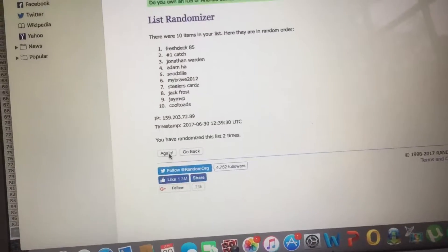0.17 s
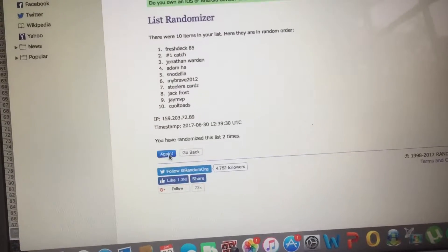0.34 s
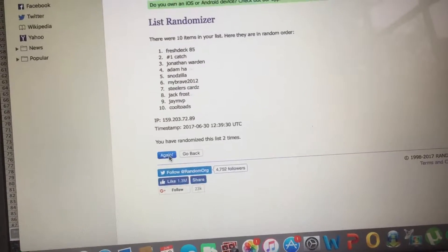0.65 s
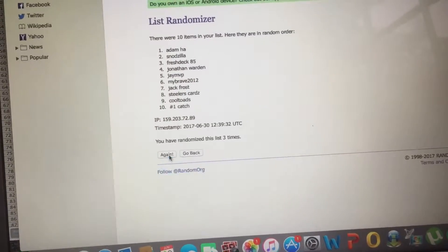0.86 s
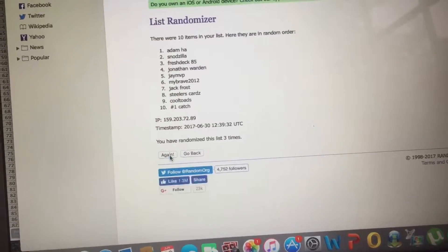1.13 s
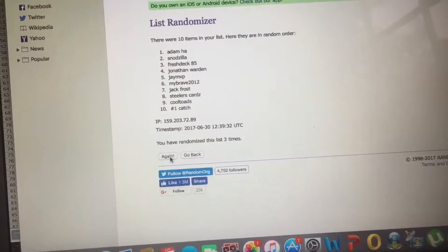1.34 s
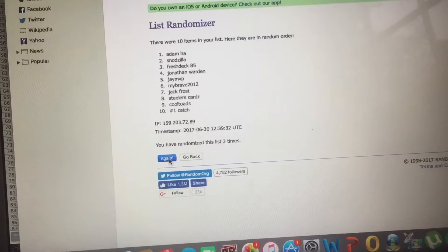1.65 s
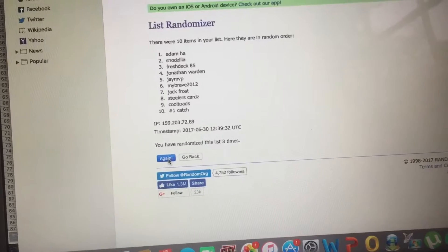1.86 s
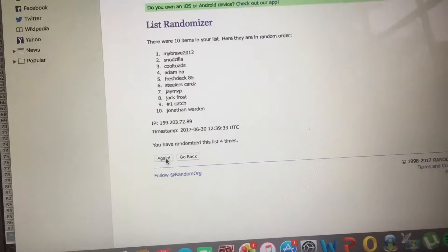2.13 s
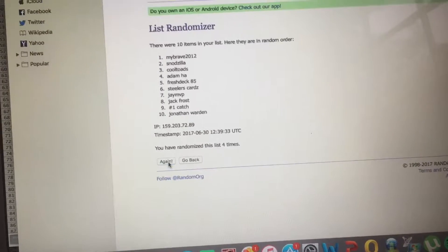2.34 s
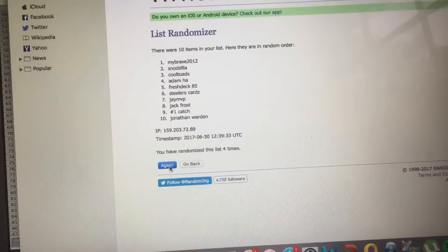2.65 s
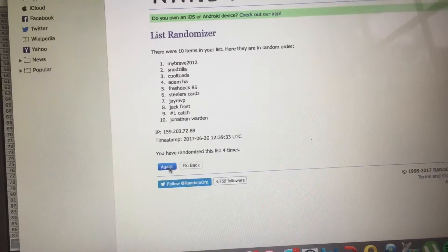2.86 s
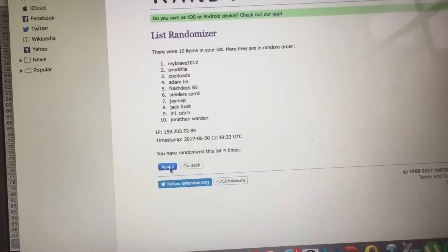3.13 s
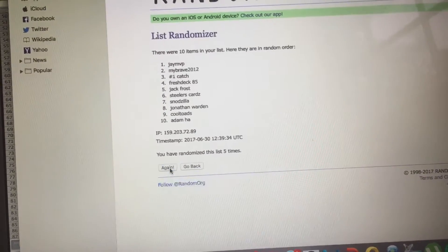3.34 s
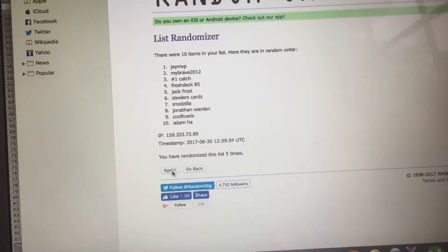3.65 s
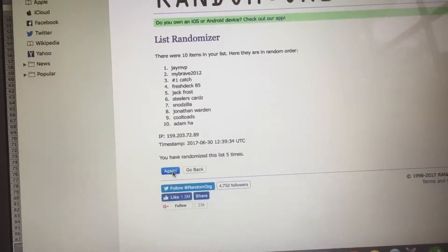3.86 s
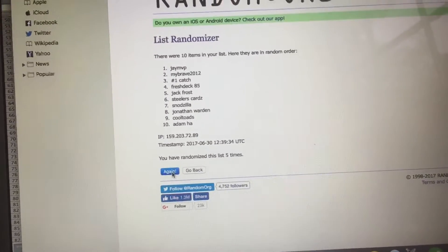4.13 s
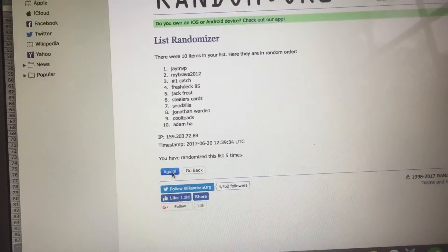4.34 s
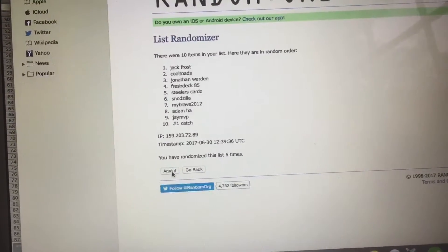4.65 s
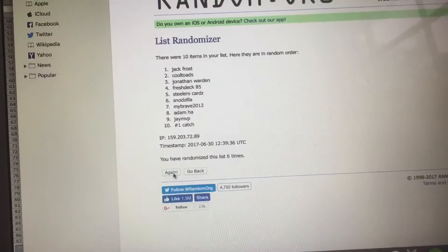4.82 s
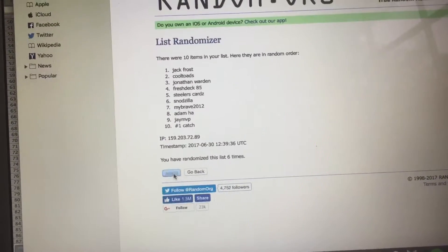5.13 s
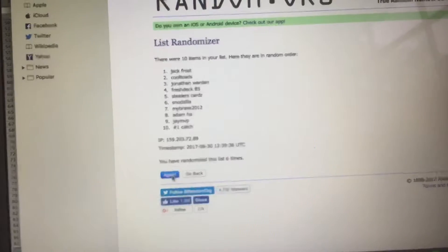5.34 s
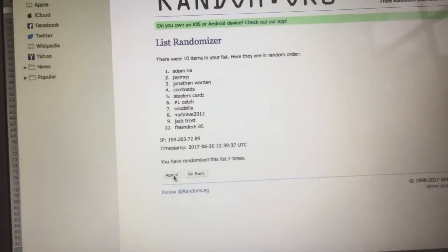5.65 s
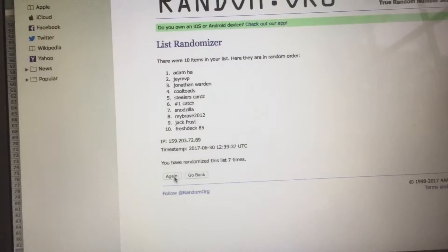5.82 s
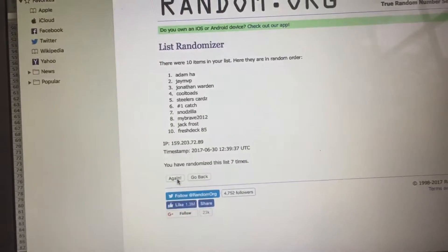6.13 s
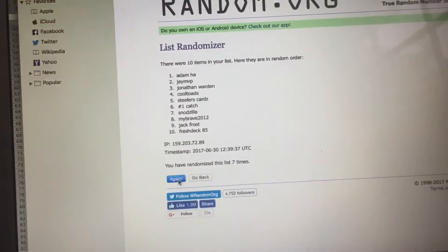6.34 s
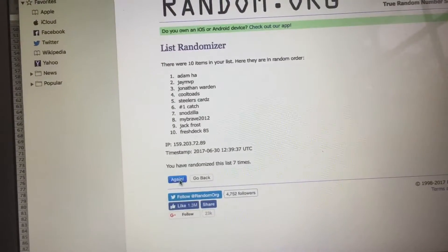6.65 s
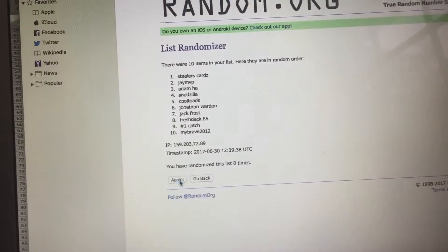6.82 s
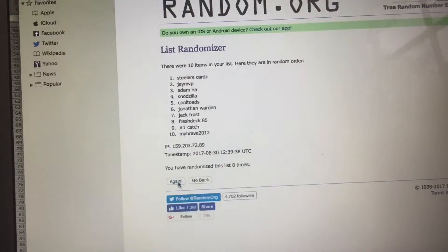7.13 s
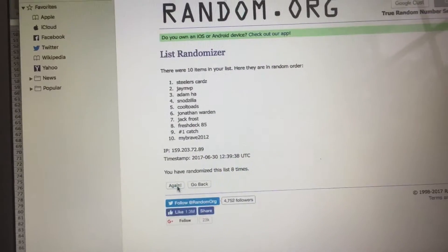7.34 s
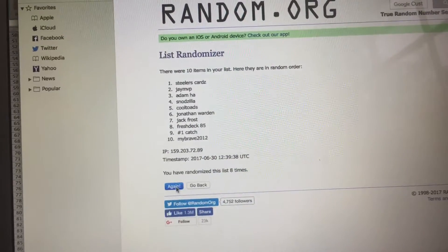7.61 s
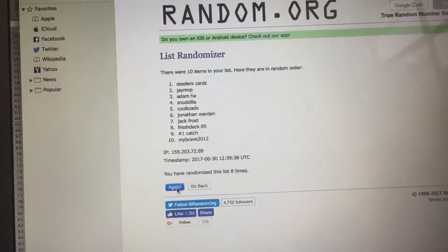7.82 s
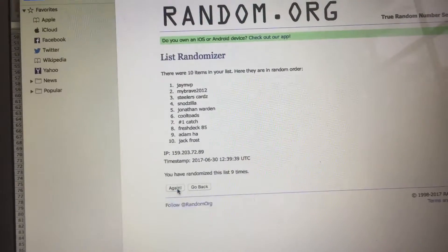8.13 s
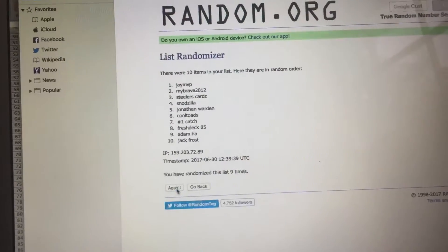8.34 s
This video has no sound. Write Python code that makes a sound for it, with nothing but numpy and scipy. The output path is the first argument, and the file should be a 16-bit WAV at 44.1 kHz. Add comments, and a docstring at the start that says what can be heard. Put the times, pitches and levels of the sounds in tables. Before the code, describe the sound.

A computer mouse is clicked on a desk in a small quiet room, close to a hand-held microphone. Seven clicks come at an even pace, at about 0.3, 1.6, 2.6, 3.9, 5.2, 6.4 and 7.7 seconds. Each is a crisp plastic snap, followed a tenth of a second later by a dull release and a light tick as the finger lifts. The click at 3.9 seconds is doubled. Small hollow plastic knocks sound near 1 and 2.2 seconds, and a very faint thin squeak just after the first. The hand bumps softly on mouse and desk between clicks, most clearly around 6.3, 7.4 and 8.4 seconds. Behind everything run two faint clock-like tickings, one quick and one about once a second, over a low rumble and even hiss. The room adds a short reverberation.

```python
"""A desk in a small quiet room, with a hand-held phone microphone close to a computer mouse.
The mouse is clicked about every 1.2 s: each press snaps the switch and rings the shell, the button
comes back with a dull thock, and a light tick follows as the finger lifts. Between clicks the hand
bumps softly and plastic knocks. Behind them lie two faint clock-like tickings, one thin squeak
and low room noise."""
import sys
import numpy as np
from scipy import signal
from scipy.fft import rfft, irfft
from scipy.io import wavfile

SR = 44100
rng = np.random.default_rng(int(sys.argv[2]) if len(sys.argv) > 2 else 0)


def to_wav(sig):
    """Store sig (one row per channel, or 1-D mono) as 16-bit WAV at the path in sys.argv[1].

    Samples outside -1..1 are clipped; the rate is SR.
    """
    pcm = np.clip(np.atleast_2d(sig), -1, 1) * 32767
    pcm = np.round(pcm).astype(np.int16)
    wavfile.write(sys.argv[1], SR, pcm.T)  # frames by channels


N = 373968
BLOW_SIZE = 4096  # samples in one click, thud or tick
FREQ = np.maximum(np.fft.rfftfreq(BLOW_SIZE, 1 / SR), 1)

# room tone, its rumble and middle: frequency_hz, density_db
ROOM_TONE = [(20, -26), (35, -1.5), (60, 5), (85, -3.5), (130, -3.5), (200, -3.5), (300, -12.5), (450, -17),
             (700, -21), (1050, -17), (1400, -20), (2500, -23), (4800, -30)]
# the hiss on top of it: frequency_hz, density_db
ROOM_HISS = [(5700, -27.5), (7000, -31.5), (9500, -32), (10500, -36.5), (12000, -33.5), (16000, -38.5)]
# the room's reverberation by band: centre_hz, level_db, t60_s
REVERB_BANDS = [(101, 5, 0.74), (237, -6, 0.69), (670, -11.5, 0.51), (1110, -5.5, 0.5), (1705, -17.5, 0.49),
                (2460, -5.5, 0.62), (2900, -16.5, 0.64), (4370, -12, 0.46), (8000, -11.5, 0.58),
                (15000, -12.5, 0.34)]
# the quick and the slow ticking: start_s, period_s
TICKINGS = [(.4702, .3), (.574, 1.0033)]
# colour of their ticks: frequency_hz, gain_db
TICK_COLOUR = [(800, -18.5), (2600, -10), (4500, -16), (6800, -21), (7800, 1), (8800, -22), (11000, -24.5),
               (15000, -16.5)]
# how the desk passes a thud on: frequency_hz, gain_db
DESK_RESPONSE = [(170, 4.5), (245, 1), (315, 3), (420, 2), (620, -3), (760, 8), (1000, 14), (1250, -4),
                 (2000, 17)]
# the clearer bumps of hand and mouse: start_s, peak_db, pitch_hz
HAND_BUMPS = [(0.498, -38.5, 87), (1.931, -44, 126), (2.013, -36, 149), (2.358, -42.5, 156),
              (3.137, -40, 70.0), (3.362, -37.5, 143), (3.68, -43, 168), (3.693, -39.5, 138),
              (3.92, -33, 116), (4.233, -43.5, 56), (6.036, -41, 188), (6.3, -25, 137), (6.353, -44, 118),
              (7.448, -29, 176), (8.333, -30.5, 172), (8.355, -29.5, 167), (8.426, -28, 347)]
# small hollow knocks of plastic: start_s, peak_db, pitch_hz
PLASTIC_KNOCKS = [(.9955, -48, 457), (.9972, -44.5, 1590), (2.1835, -59, 506), (2.184, -52.5, 875)]
# resonances of the mouse shell on the desk: pitch_hz, width_hz, level_db
SHELL_MODES = [(216, 270, -11), (492, 290, -9), (755, 100, -7.5), (910, 295, -10), (1227, 29, -6.5),
               (1546, 267, 0), (1719, 358, 1.5), (2140, 145, -6.5), (2468, 70, -13), (2887, 370, -12.5),
               (3290, 500, -13.5), (4400, 600, -18)]
# colour of the switch's bright crack: frequency_hz, gain_db
SWITCH_COLOUR = [(1500, -2), (3500, -2), (5200, -14), (6000, 8), (6700, -4), (7600, 2), (9400, 0),
                 (10400, -5), (12500, -7.5), (16000, -7.5)]
# the finger landing on the shell ahead of some presses, once as hard as a click: start_s, level_db
FINGER_LANDINGS = [(2.56, -45.5), (3.9095, -39), (3.9165, -20), (6.287, -52), (7.5901, -42.5)]
# presses of the button: start_s, level_db, held_s, lift_after_release_s, lift_level_db
PRESSES = [(0.338, -21, 0.098, 0.032, -39.5), (1.5655, -20, 0.096, 0.031, -42.5),
           (2.626, -21, 0.1, 0.022, -44.5), (3.9356, -19, 0.1, 0.038, -44.5),
           (5.2335, -20, .1045, 0.03, -44), (6.4114, -21, 0.12, 0.037, -42.5),
           (7.6504, -21, 0.11, .0357, -44)]


def undb(db):
    """Decibels to gain."""
    return 10 ** (np.asarray(db) / 20)


def colour(points, hz):
    """Gain at hz of (frequency_hz, gain_db) points joined on a log-frequency axis."""
    points_hz, db = np.transpose(points)
    return undb(np.interp(np.log(np.maximum(hz, 1)), np.log(points_hz), db))


def tinted_noise(points, size):
    """Noise of rms 1 with the given colour."""
    noise = irfft(rfft(rng.standard_normal(size)) * colour(points, np.fft.rfftfreq(size, 1 / SR)), size)
    return noise / noise.std()


def minimum_phase(gain):
    """The spectrum of the promptest blow that has these gains."""
    cepstrum = irfft(np.log(gain))
    cepstrum[1:BLOW_SIZE // 2] *= 2
    cepstrum[BLOW_SIZE // 2 + 1:] = 0
    return np.exp(rfft(cepstrum))


def delay(seconds):
    """The spectrum of a delay."""
    return np.exp(-2j * np.pi * FREQ * seconds)


def soft_contact(hz, order):
    """The spectrum of a soft push: flat up to hz, falling above."""
    return signal.freqs(*signal.butter(order, hz, analog=True), FREQ)[1]


def lossless_resonance(hz, width_hz):
    """An all-pass spectrum: it stores the band around hz and lets it go a moment later."""
    pole = hz ** 2 - FREQ ** 2 + 1j * FREQ * width_hz
    return np.conj(pole) / pole


def through_desk(spectrum, lag_s):
    """A pulse of peak 1 after travelling as a bending wave: lag_s late at 1 kHz, the lows later still."""
    pulse = irfft(spectrum * delay(2 * lag_s / np.sqrt(FREQ / 1000)))
    return pulse / np.abs(pulse).max()


def add(track, start_s, sound):
    """Mix a sound into the track at start_s."""
    i = max(int(round(start_s * SR)), 0)
    track[i:i + len(sound)] += sound[:max(N - i, 0)]


def room_tone(level_db=-62, waver_db=2, rumble_hz=350):
    """The bed of the room: even hiss over a low rumble that wavers."""
    noise = tinted_noise(ROOM_TONE + ROOM_HISS, N)
    rumble = signal.sosfiltfilt(signal.butter(2, rumble_hz, fs=SR, output="sos"), noise)
    knots = np.arange(0, N, SR // 12)
    waver = np.interp(np.arange(N), knots, rng.standard_normal(len(knots)))
    return undb(level_db) * (noise + rumble * (undb(waver_db * waver) - 1))


def room_reverb(direct, early_db=9, early_t60_s=0.1, first_echo_s=0.0037):
    """Strong early reflections reach the microphone from desk and screen, then a short diffuse tail."""
    t = np.arange(SR // 2) / SR
    log_hz = np.log(np.maximum(np.fft.rfftfreq(len(t), 1 / SR), 1))
    log_centres = np.log(np.array(REVERB_BANDS)[:, 0])
    noise, response = rfft(rng.standard_normal(len(t))), 0
    early = undb(early_db - 60 * t / early_t60_s)
    for (_, level_db, t60_s), share in zip(REVERB_BANDS, np.eye(len(REVERB_BANDS))):
        band = irfft(noise * np.interp(log_hz, log_centres, share), len(t))
        fade = (undb(-60 * t / t60_s) + early) * (t > first_echo_s)
        response = response + undb(level_db) * band * fade / np.sqrt(np.sum(fade ** 2))
    return signal.fftconvolve(direct, response)[:N]


def tickings(quick_db=-47.5, slow_db=-52.5, scatter_db=0.5, length_s=0.001):
    """Two faint, even series of clock-like ticks, each tick a tiny burst of coloured noise."""
    out, t = np.zeros(N), np.arange(BLOW_SIZE) / SR
    tint = minimum_phase(colour(TICK_COLOUR, FREQ))
    for (first_s, period_s), peak_db in zip(TICKINGS, (quick_db, slow_db)):
        for start_s in np.arange(first_s, N / SR, period_s):
            burst = rng.standard_normal(BLOW_SIZE) * np.exp(-(t / length_s) ** 4)
            tick = irfft(rfft(burst) * tint)
            peak = undb(peak_db + scatter_db * rng.standard_normal())
            add(out, start_s, peak * tick / np.abs(tick).max())
    return out


def squeak(start_s=1.125, length_s=0.44, level_db=-64, pitch_hz=2170, width_hz=90,
           attack_s=0.015, fade_s=0.018, linger_db=-12):
    """Faint rubbing on one narrow resonance: a quick swell that sinks to a trace."""
    t = np.arange(N) / SR - start_s
    tone = signal.lfilter(*signal.iirpeak(pitch_hz, pitch_hz / width_hz, fs=SR), rng.standard_normal(N))
    gate = np.clip(np.minimum(t, length_s - t) / attack_s, 0, 1)
    swell = np.exp(-np.maximum(t - attack_s, 0) / fade_s) + undb(linger_db)
    return undb(level_db) * gate * swell * tone / tone.std()


def thuds(blows, damping, cutoff_ratio, max_cutoff_hz, order, lag_s, rebound, rebound_s):
    """Each blow is a soft push and its rebound on one damped resonance, carried by the desk."""
    out, jf = np.zeros(N), 1j * FREQ
    desk = minimum_phase(colour(DESK_RESPONSE, FREQ))
    bounce = 1 + rebound * delay(rebound_s)
    for start_s, peak_db, pitch_hz in blows:
        body = jf / (jf * jf + jf * pitch_hz * damping + pitch_hz ** 2)
        push = soft_contact(min(pitch_hz * cutoff_ratio, max_cutoff_hz), order)
        add(out, start_s, undb(peak_db) * through_desk(push * bounce * body * desk, lag_s))
    return out


def hand_bumps(stir_count=7, stir_db=-51.5, stir_hz=101, spread_db=2, spread_octaves=0.57):
    """The hand bumps dully on mouse and desk, with slighter stirs at random moments."""
    stirs = [(N / SR * (1 + when) / 2, stir_db + spread_db * size, stir_hz * 2 ** (spread_octaves * pitch))
             for when, size, pitch in rng.uniform(-1, 1, (stir_count, 3))]
    return thuds(HAND_BUMPS + stirs, damping=0.64, cutoff_ratio=2.45, max_cutoff_hz=448, order=6,
                 lag_s=0.001, rebound=0.17, rebound_s=0.00593)


def plastic_knocks():
    """Small knocks of plastic, lightly damped so that they sound hollow."""
    return thuds(PLASTIC_KNOCKS, damping=0.11, cutoff_ratio=0.93, max_cutoff_hz=1900, order=4,
                 lag_s=0.00018, rebound=0.45, rebound_s=0.00245)


def clicks(taps, crack_db, crack_t60_s, shell_db, contact_hz, db_per_octave, scatter_db=0.4):
    """The switch cracks; an instant later the button lands and the shell rings, never quite alike."""
    out, t = np.zeros(N), np.arange(BLOW_SIZE) / SR
    spring = tinted_noise(SWITCH_COLOUR, BLOW_SIZE)  # the same spring snaps every time
    edge_echo = 1 - 0.19 * delay(0.001485)  # the wave comes back inverted from a near edge
    shell_lag = delay(0.00027) * lossless_resonance(hz=2695, width_hz=300)
    for start_s, level_db in taps:
        power = 0
        for pitch_hz, width_hz, mode_db in SHELL_MODES:
            gain = undb(mode_db + scatter_db * rng.standard_normal())
            power += (gain / (1 + (2 * (FREQ - pitch_hz) / width_hz) ** 2)) ** 2
        ring = minimum_phase(np.sqrt(power) + undb(-74))
        shell = -through_desk(ring * edge_echo * shell_lag, lag_s=0.001035)
        grain = tinted_noise(SWITCH_COLOUR, BLOW_SIZE)
        crack = (1.2 * spring + 1.14 * grain) * undb(-60 * t / crack_t60_s)
        click = undb(shell_db) * shell + undb(crack_db) * crack
        # a lighter touch is a softer contact, so it loses its treble
        cutoff_hz = contact_hz * 2 ** ((level_db + 41.5) / db_per_octave)
        add(out, start_s, undb(level_db) * irfft(soft_contact(cutoff_hz, order=3) * rfft(click)))
    return out


def mouse_button(thock_db=-37, thock_hz=229):
    """Close to the microphone: a snap on the press, a thock on release, a grainy tick at the lift."""
    presses, releases, lifts = [], [], []
    for start_s, level_db, held_s, lift_s, lift_db in PRESSES:
        presses.append((start_s, level_db))
        releases.append((start_s + held_s, thock_db, thock_hz))
        lifts.append((start_s + held_s + lift_s, lift_db))
    snaps = clicks(presses + FINGER_LANDINGS, crack_db=-20, crack_t60_s=0.011, shell_db=5,
                   contact_hz=3400, db_per_octave=9)
    ticks = clicks(lifts, crack_db=-5, crack_t60_s=0.025, shell_db=3, contact_hz=2570, db_per_octave=17)
    thocks = thuds(releases, damping=0.55, cutoff_ratio=2.4, max_cutoff_hz=900, order=2,
                   lag_s=0.00298, rebound=0.21, rebound_s=0.00487)
    return snaps + ticks + thocks


def scene():
    """Mono, at the desk: the button in front, bumps and knocks with less reverb, the quiet room behind."""
    button = mouse_button()
    handling = hand_bumps() + plastic_knocks()
    reverb = room_reverb(button + undb(-12) * handling)
    return (button + handling + reverb + tickings() + squeak() + room_tone())[None]


def record(dry):
    """The phone cuts off steeply above 16 kHz."""
    return signal.sosfilt(signal.ellip(10, 0.1, 70, 16000, fs=SR, output="sos"), dry)


dry = scene()
out = record(dry)
to_wav(out)
```